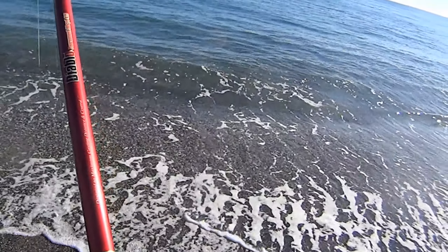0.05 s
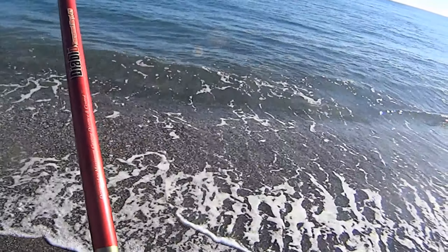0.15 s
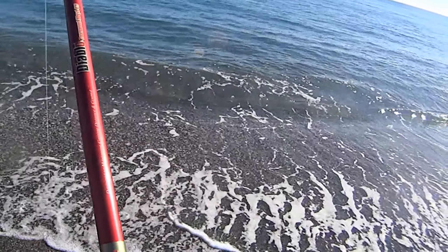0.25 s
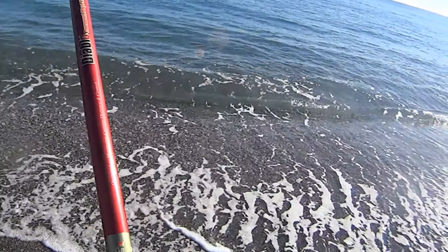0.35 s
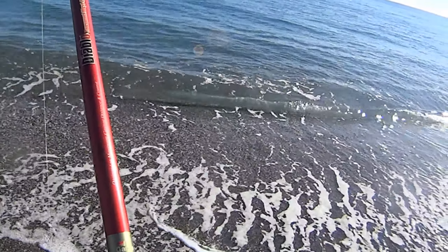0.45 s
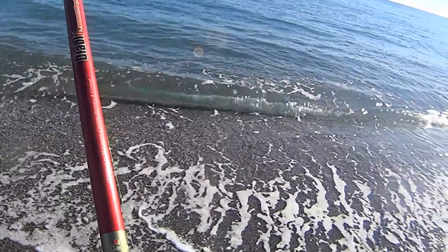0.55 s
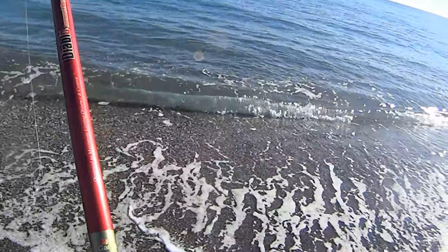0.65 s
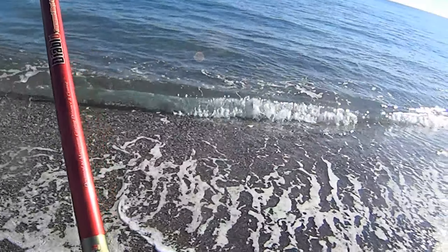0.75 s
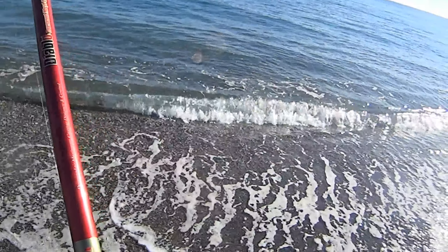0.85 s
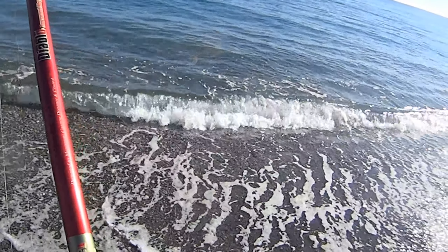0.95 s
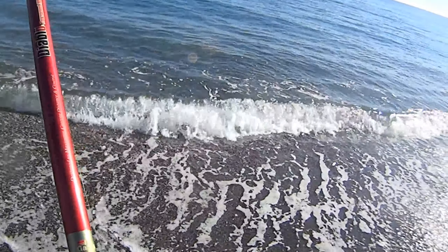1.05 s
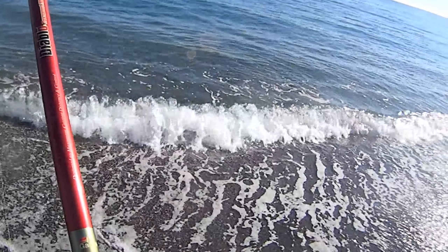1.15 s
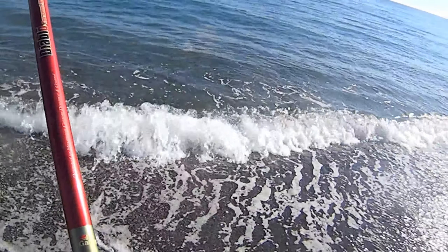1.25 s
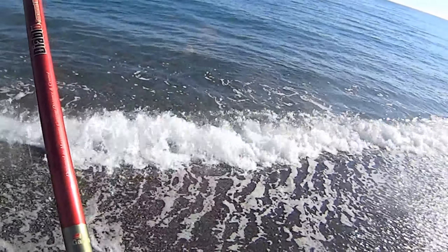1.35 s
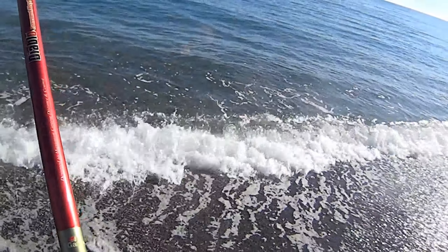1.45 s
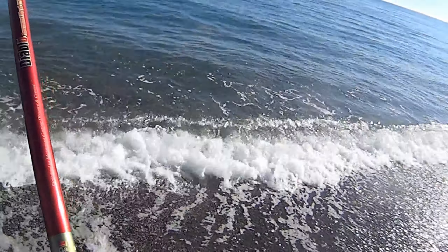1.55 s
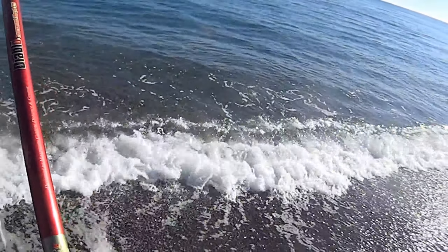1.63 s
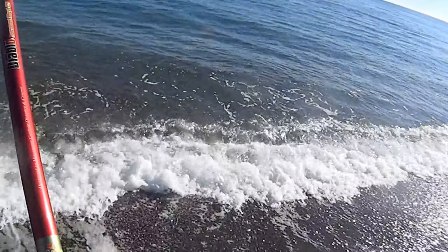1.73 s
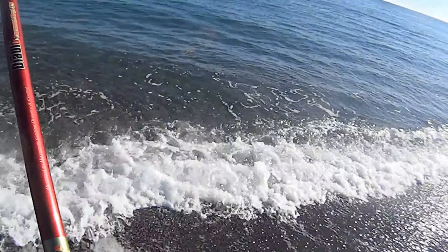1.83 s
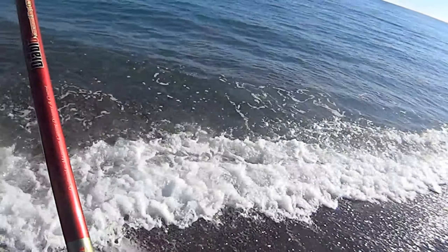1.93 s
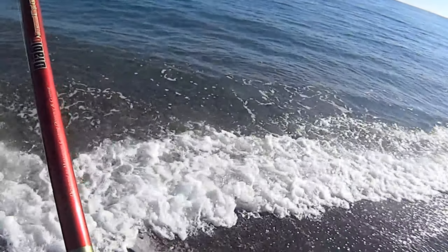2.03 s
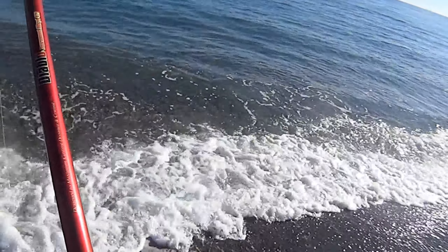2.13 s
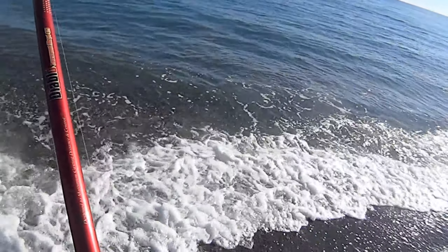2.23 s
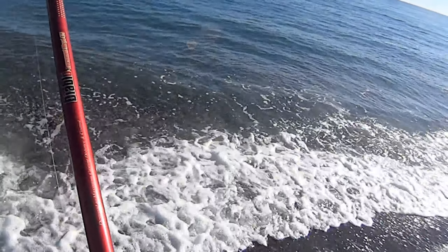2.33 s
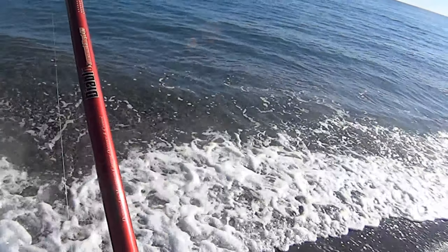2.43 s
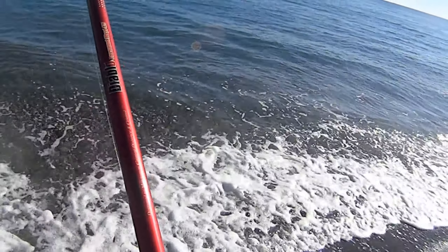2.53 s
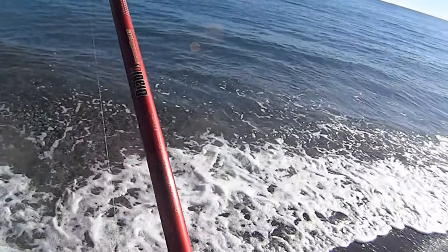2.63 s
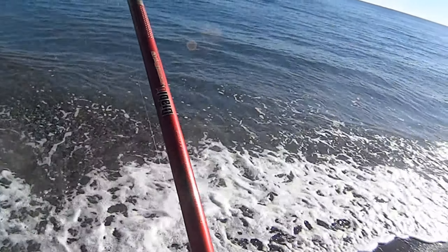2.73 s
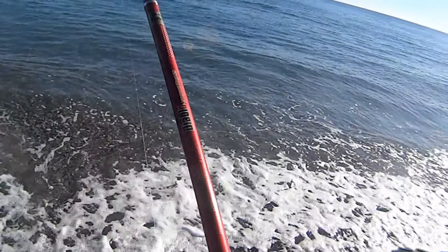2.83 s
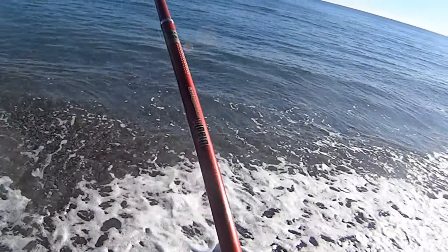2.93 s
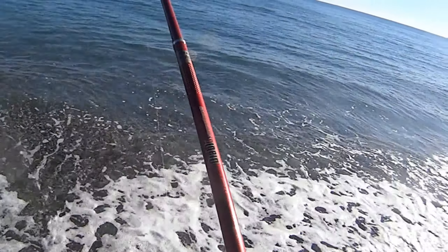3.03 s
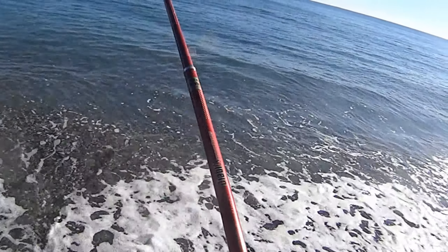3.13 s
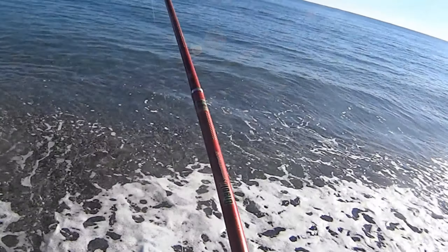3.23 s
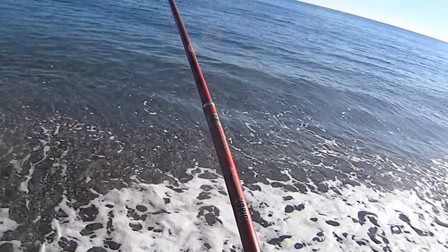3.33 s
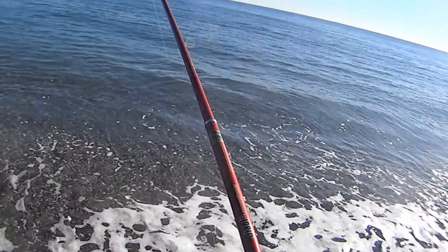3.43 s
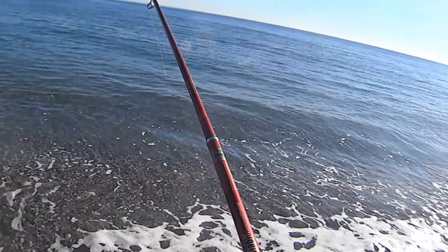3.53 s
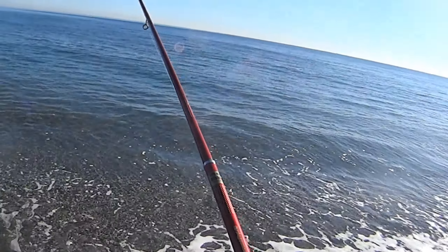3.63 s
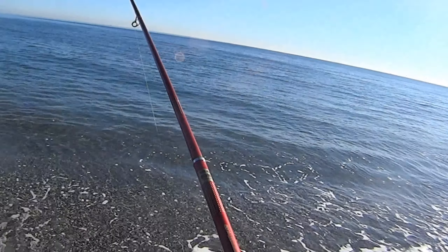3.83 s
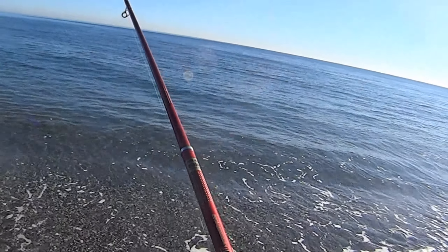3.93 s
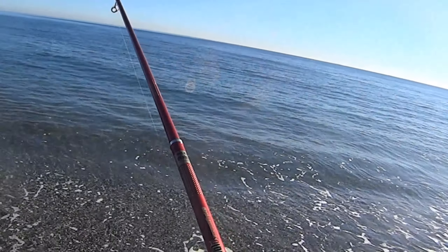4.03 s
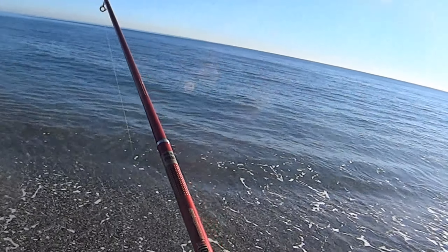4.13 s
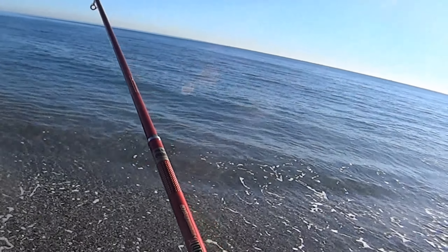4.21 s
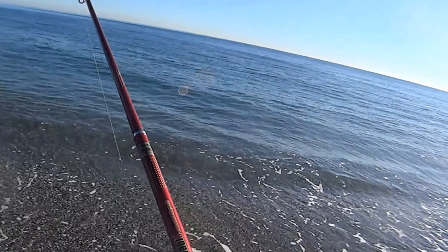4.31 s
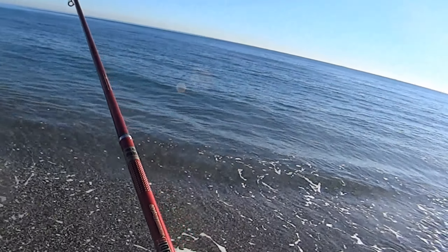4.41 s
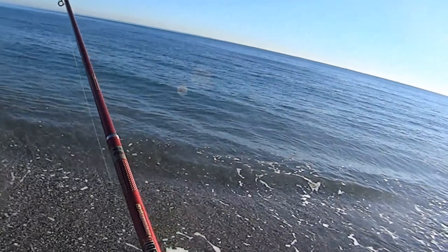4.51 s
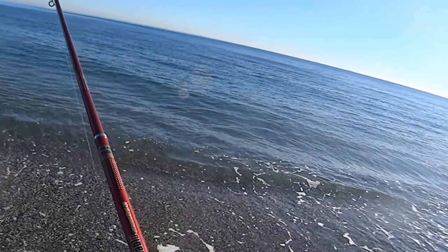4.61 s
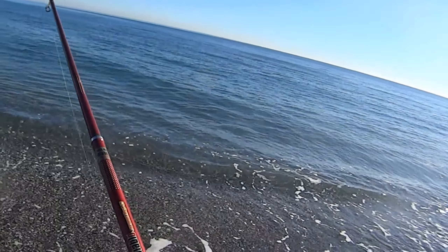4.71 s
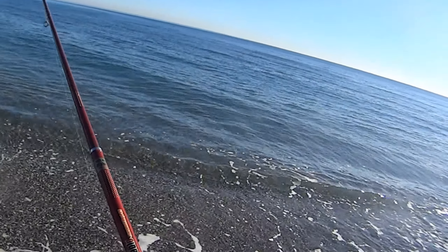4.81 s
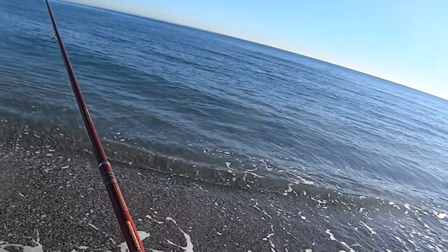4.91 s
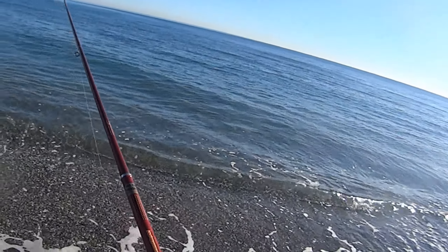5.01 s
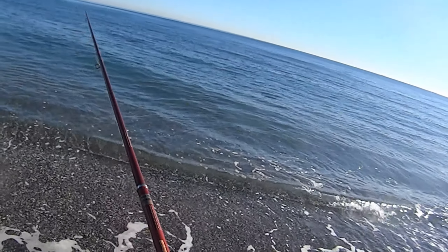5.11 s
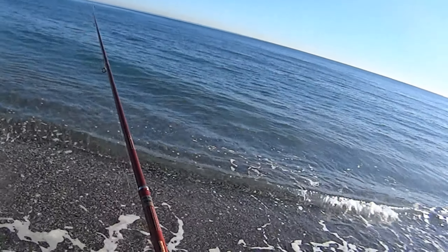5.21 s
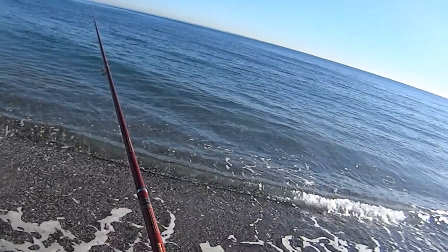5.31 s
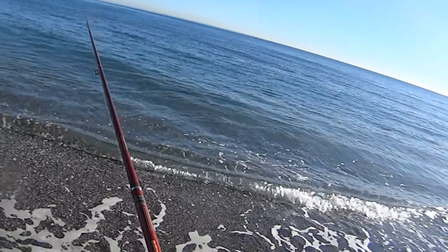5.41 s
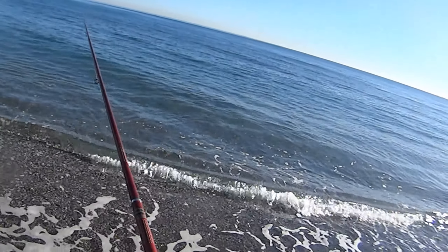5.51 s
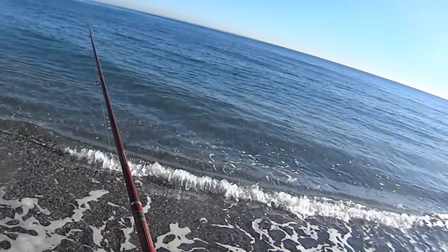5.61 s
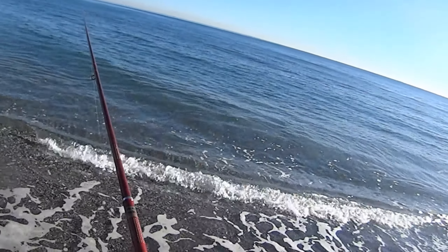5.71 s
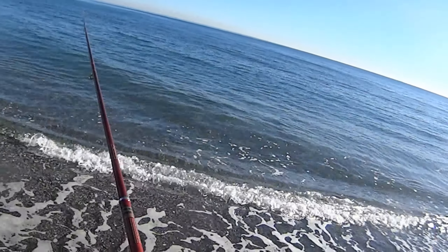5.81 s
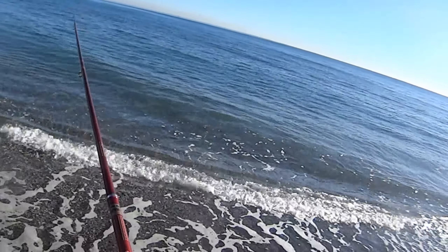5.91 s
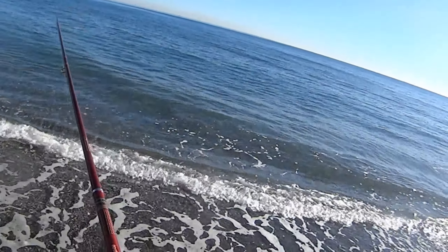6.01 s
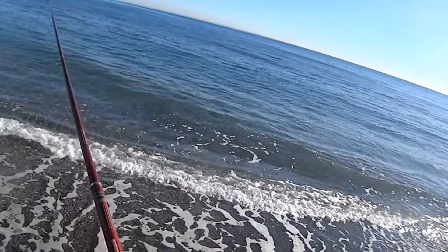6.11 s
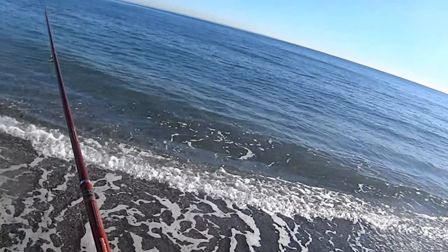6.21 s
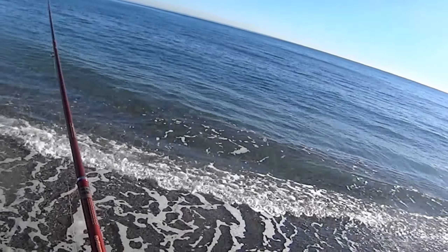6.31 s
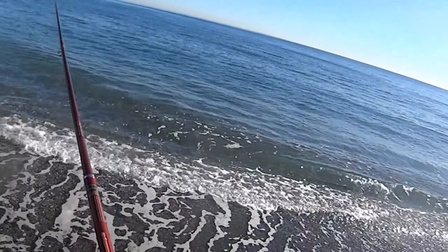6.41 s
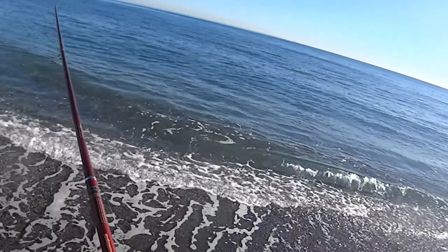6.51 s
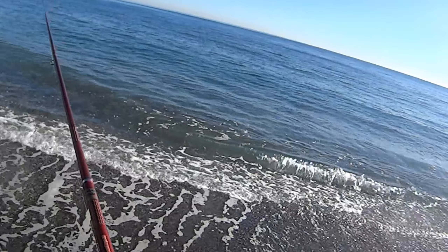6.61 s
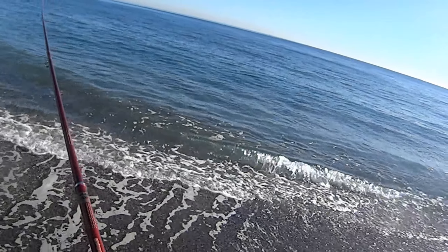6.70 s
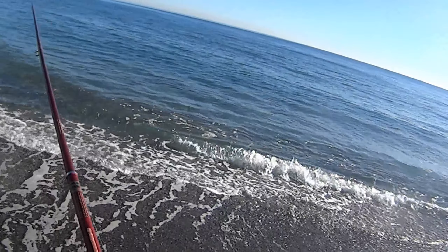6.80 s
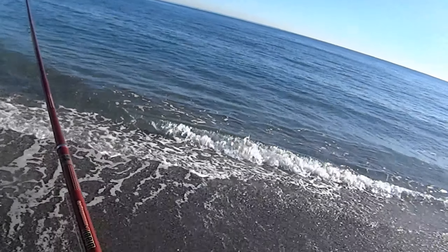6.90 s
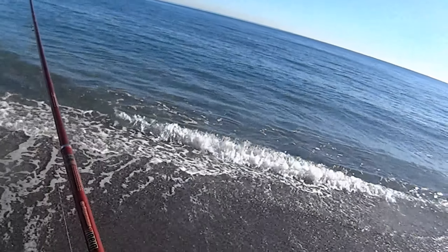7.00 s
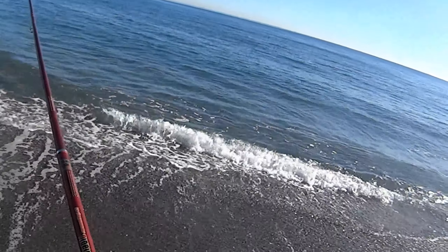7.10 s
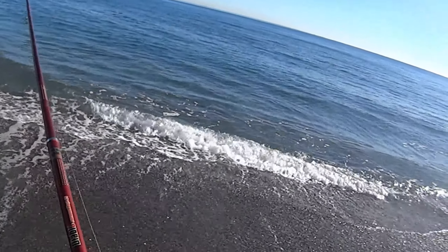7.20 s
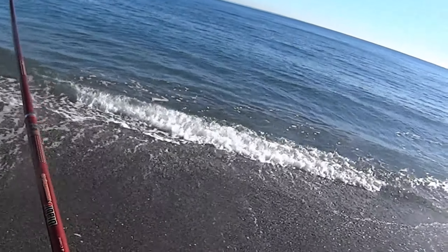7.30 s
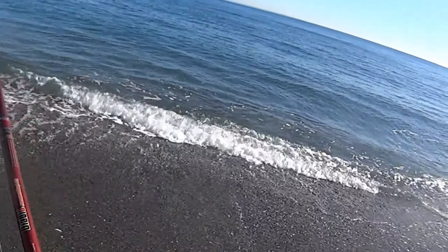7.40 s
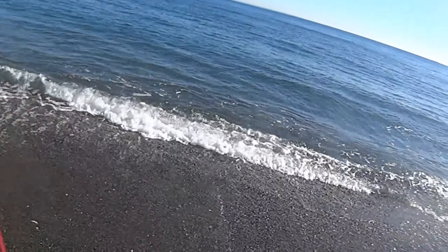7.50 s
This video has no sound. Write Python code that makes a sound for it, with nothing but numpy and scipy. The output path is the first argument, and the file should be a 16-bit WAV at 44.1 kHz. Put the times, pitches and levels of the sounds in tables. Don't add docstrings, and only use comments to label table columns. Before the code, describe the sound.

On an open pebble beach, a fishing reel ticks close to the microphones, about fifty bright, dry metallic clicks a second. Water fizzes quietly until a small wave rises from 0.7 s and breaks fullest at 1.2-1.6 s, a broad splashing rush with low gulping bubbles. The reel slows near 2 s, when a loud, hard double knock of tackle sounds; then winding speeds up. The wave drains into fine, crackling hiss by 3 s, leaving a calmer stretch to 4.5 s. Small hollow taps come around 4.6-4.8 s, light ticks near 5 s. A second wave swells, peaking at 5.6 s, while the reel whirrs fastest around 5.9 s. A clear knock lands at 6.1 s. Another breaker washes in near 6.9 s, with faint taps and a cluster of tiny clicks around 7.4-7.5 s. Soft wind rumble grows late beneath a dull distant surf roar; the housing gives a boxy, slightly resonant colour.

```python
import sys
import numpy as np
from scipy import signal
from scipy.fft import rfft, irfft, next_fast_len
from scipy.io import wavfile

SR = 44100
rng = np.random.default_rng(int(sys.argv[2]) if len(sys.argv) > 2 else 0)


def field_ratio(decibels):
    return 10 ** (np.asarray(decibels, dtype=float) / 20)


def wav_out(sig):
    wavfile.write(sys.argv[1], SR, np.round(np.clip(np.atleast_2d(sig).T, -1, 1) * 32767).astype(np.int16))


N = 332943
SIZE = next_fast_len(N + 8192)
HZ = np.maximum(np.arange(SIZE // 2 + 1) * SR / SIZE, 1)

# f/Hz, width/Hz, boost/dB
CAVITIES = [(1079, 110, 3.5), (1388, 85, 9.5), (1270, 80, 3.5), (1600, 110, 3), (2415, 100, 4),
            (3360, 300, 2), (670, 160, -3)]


def rms_one(x):
    return x / np.sqrt(np.mean(x ** 2) + 1e-20)


def pair_rms_one(both):
    return both / np.sqrt(np.mean(both.mean(axis=0) ** 2))


def in_time(rows):
    s, *columns = np.transpose(rows)
    return [np.interp(np.arange(N) / SR, s, c) for c in columns]


def in_pitch(rows):
    hz, *columns = np.transpose(rows)
    return [np.interp(np.log(HZ), np.log(hz), c) for c in columns]


def drift(rate):
    r = np.exp(-80 * np.pi * rate / SR)
    noise = rng.standard_normal(N // 40 + 2002)
    slow = signal.lfilter([1], [1, -2 * r, r * r], noise)[2000:]
    return np.interp(np.arange(N) / 40, np.arange(len(slow)), rms_one(slow))


def ring(clicks, hz, t60):
    r, w = field_ratio(-60 / (t60 * SR)), 2 * np.pi * hz / SR
    return signal.lfilter([0, np.sin(w)], [1, -2 * r * np.cos(w), r * r], clicks + 1e-18)


def housing():
    # f/Hz, level/dB per Hz
    colour = [(70, -29), (220, -18.5), (400, -13.5), (680, -13.5), (950, -10.5), (1400, -6), (1900, -14.5),
              (2700, -9.5), (3100, -3), (4500, -4.5), (5400, -2), (6600, -4.5), (8000, -10.5),
              (11000, -17.5)]
    peaks_db = sum(db / (1 + (2 * (HZ - hz) / width) ** 2) for hz, width, db in CAVITIES)
    return field_ratio(in_pitch(colour)[0] + peaks_db)


def ports(shared, own, gain):
    # f/Hz, likeness/0-1, left lead/rad, left-right/dB
    port_pair = [(40, 1, -0.011, 0.5), (130, 0.74, -0.71, 0.2), (300, 0.37, -0.49, 0),
                 (644, 0.17, -1.54, 1), (1050, 0.87, -1.8, 1.5), (1340, 0.74, -0.69, -1),
                 (1670, 0, -1.15, -1), (2440, 1, -1.7, -1), (3200, 0.55, -0.62, -5.5),
                 (4300, 0.97, -0.59, -2), (6100, 0.87, -0.22, -2), (7360, 0.66, 0.58, -2.5),
                 (9300, 1, 1, -1), (11200, 0.82, -1.4, -0.8)]
    alike, lead, pan_db = in_pitch(port_pair)
    alike = np.clip(alike, 0, 1)
    mid = np.sqrt(1 + alike) * rfft(shared, SIZE)
    side = np.sqrt(1 - alike) * rfft(own, SIZE)
    tilt = field_ratio(pan_db / 2) * np.exp(.5j * lead)
    both = np.array([(mid + side) * tilt, (mid - side) / tilt])
    return irfft(gain * both, SIZE)[:, :N] / np.sqrt(2)


def breeze():
    # t/s, peak level/dB
    gust_peaks = [(0.0, -75), (0.97, -67), (1.25, -61), (1.7, -66), (2.61, -59), (2.9, -64), (3.32, -62),
                  (3.97, -57), (4.15, -59), (4.7, -57), (5.28, -60), (5.85, -55.5), (6.14, -55),
                  (6.55, -50), (6.72, -51.5), (6.92, -52), (7.06, -54), (7.33, -50), (7.52, -50)]
    rise_db_per_s, fall_db_per_s, calm_db, far_surf_db = 70, 40, -78, -72.5
    gusts = rng.standard_normal((2, N)) * field_ratio(1.7 * drift(1.1))
    slope = HZ / 14 / (1 + (HZ / 20) ** 6.6)
    wind = rms_one(ports(*gusts, slope))
    shore_slope = HZ / 12 / (1 + HZ / 12) * (1 + 25 / HZ) / (1 + (HZ / 900) ** 10)
    shore = rms_one(ports(*rng.standard_normal((2, N)), shore_slope))
    late = np.arange(N) / SR - np.array(gust_peaks)[:, :1]
    swell_db = np.array(gust_peaks)[:, 1:] + np.minimum(rise_db_per_s * late, -fall_db_per_s * late)
    wind_db = np.maximum(swell_db.max(axis=0), calm_db) + 0.5
    return field_ratio(wind_db) * wind + field_ratio(far_surf_db + 10.5) * shore


def knocks():
    # t/s, peak level/dB, ring f/Hz, cavity level/dB, left-right/dB
    tackle = [(.2515, -39, 2100, -8, 0), (2.0197, -13.5, 2550, -30, 3), (2.0243, -8, 2650, -30, 2),
              (4.6043, -37, 1900, -8, -5), (4.7990, -31.5, 2300, 0, -6), (4.8030, -33, 1050, -6, -6),
              (4.8065, -35, 1200, -6, -6), (6.0883, -19.5, 2450, -22, -1.5), (6.7000, -35, 1400, -5, -2),
              (6.9100, -31, 1500, -8, -2.5), (7.1800, -34, 1700, -8, -2), (7.4320, -32, 1200, -8, -2)]
    # t/s, peak level/dB, ring f/Hz
    light_ticks = [(.0185, -30, 3300), (.4070, -24, 6000), (4.9900, -24, 5600), (5.0958, -26, 3830),
                   (5.1362, -23, 4600), (6.9924, -25, 5400), (7.3555, -25, 6000), (7.3672, -22, 6500),
                   (7.4665, -23, 6500), (7.4790, -18, 8000), (7.4868, -20, 5600), (7.4885, -24, 3300)]
    tick_cavity_db, tick_pan_db, thud_db = -25, -3, -12
    out, length = np.zeros((2, N)), 2048
    tap = np.diff(np.eye(1, length + 1, 1)[0])
    hollow = ring(tap, CAVITIES[0][0], .022) + .9 * ring(tap, CAVITIES[1][0], .03)
    thud = ring(np.cumsum(tap), 260, .006)
    blows = [*tackle, *((*tick, tick_cavity_db, tick_pan_db) for tick in light_ticks)]
    for s, peak_db, hz, cavity_db, pan_db in blows:
        body = ring(ring(tap, .8 * hz, .002), 1.12 * hz, .003)
        over = ring(ring(tap, 2.1 * hz, .002), 2.1 * hz, .003)
        body = body / abs(body).max() + field_ratio(-11) * over / abs(over).max()
        body += field_ratio(cavity_db + 14) * hollow + field_ratio(2 * cavity_db + thud_db + 14) * thud
        i = round(s * SR)
        pan = field_ratio([[pan_db / 2], [-pan_db / 2]])
        out[:, i:i + length] -= (field_ratio(peak_db - 0.5) * body * pan)[:, :N - i]
    return out


def reel():
    # t/s, speed/teeth per s, ticking level/dB, frame level/dB as the grip changes
    winding = [(0.0, 48, -53, -1), (0.15, 55, -50.5, -5), (0.4, 63, -48, -7), (0.7, 62, -46, -8),
               (0.85, 60, -50, -5), (2.0, 40, -50, -5), (2.2, 80, -45.5, -4), (2.44, 95, -48, -6),
               (2.66, 117, -46, -1), (3.3, 122, -45, -9), (3.9, 128, -50, -5), (4.3, 105, -51, -5),
               (4.8, 115, -50, -6), (5.1, 150, -47.5, -4), (5.5, 195, -44.5, -8), (5.87, 215, -43, -10),
               (6.3, 176, -45.5, -2), (7.55, 180, -46.5, -6)]
    # f/Hz, level/dB, t60/s
    frame_modes = [(2950, -1, .014), (3300, 0, .013), (3750, -2, .011), (4300, -4, .010)]
    pawl_modes = [(5050, -2, .014), (5400, -1, .015), (5750, 0, .015), (6150, 0, .015), (6600, -2, .013)]
    spring_modes = [(7500, 0, .007), (8300, -2, .006), (9500, -3, .006), (10200, -3, .005),
                    (10750, -1, .005)]
    spring_db, part_wander_db = -5.5, .7
    turn_s, push_at_s, push, full_swing_per_s = .376, 3.6, .08, 120
    speed, ticking_db, frame_db = in_time(winding)
    turn = np.cos(2 * np.pi * (np.arange(N) / SR - push_at_s) / turn_s)
    speed = speed * (1 + push * np.clip(speed / full_swing_per_s, 0, 1) ** 4 * turn)
    teeth_passed = np.cumsum(speed) / SR + .0019 * speed
    at = np.flatnonzero(np.diff(np.floor(teeth_passed)) > 0)
    age = np.arange(300) / SR
    rattle = (age / .00045) ** 2 * np.exp(-age / .00045)
    force, out = field_ratio(1.3 * rng.standard_normal(N)[at]), 0
    parts = (frame_modes, frame_db), (pawl_modes, 0), (spring_modes, spring_db + frame_db / 2)
    for part, part_db in parts:
        loud_db = ticking_db + part_db + part_wander_db * drift(2.5)
        rings = np.zeros((2, N))
        for hz, level_db, t60 in part:
            drops = np.zeros(N)
            drops[at] = force * field_ratio(level_db + 2.7 * drift(6.0)[at] + 1.3 * rng.standard_normal(N)[at])
            blows = signal.fftconvolve(drops, rattle)[:N] * rng.choice([-1, 1], (2, N))
            rings += ring(blows, hz, t60) / np.sqrt(t60)
        both = ports(*(rings / np.sqrt(speed)), 1) * field_ratio([[-1.1], [1.1]])
        out = out + field_ratio(loud_db + 1.8) * pair_rms_one(both)
    return out


def gulps():
    # t/s, level/dB, f/Hz
    pockets = [(1.24, -56, 300), (1.33, -52, 189), (1.42, -46, 330), (1.55, -60, 230), (1.76, -49, 300),
               (1.82, -49, 255), (2.142, -54, 250), (5.26, -51, 244), (5.72, -56, 289), (5.77, -48.5, 254),
               (6.701, -52, 377), (6.88, -58, 252)]
    out, age = np.zeros(N), np.arange(6000) / SR
    for s, level_db, hz in pockets:
        swell = age / 0.014 * np.exp(1 - age / 0.013)
        pulse = swell * np.sin(2 * np.pi * hz * age * (1 + 1.04 * age))
        out[round(s * SR):][:len(age)] += field_ratio(level_db) * pulse
    return ports(out, 0.2 * out, 0.97)


def water(low_hz, high_hz, bursts_per_s, cycles, share, patchy_db, churn_hz):
    pair, patches = [], [drift(churn_hz), drift(4 * churn_hz)]
    pitches = np.geomspace(low_hz, high_hz, num=8)
    for side in range(2):
        sizes = field_ratio(2.1 * np.minimum(rng.exponential(1, N), 5)) * rng.choice([-1, 1], N)
        born = rng.random(N) < bursts_per_s / SR
        dealt = rng.integers(0, 8, N)
        near = 0
        for k, hz in enumerate(pitches):
            near = near + ring(sizes * born * (dealt == k), hz, cycles / hz) * np.sqrt(hz)
        far = rng.standard_normal(N)
        pair.append(field_ratio(patchy_db * sum(patches)) * (share * rms_one(near) + far))
    band = 1 / np.sqrt((1 + (low_hz / HZ) ** 12) * (1 + (HZ / high_hz) ** 12))
    return pair_rms_one(ports(*pair, band * housing()))


def surf():
    # t/s, breaking level/dB, close fine froth level/dB
    waves = [(0.0, -58.5, -1.5), (0.5, -54.5, -3), (0.71, -49, 2.5), (0.9, -44.5, 2), (1.2, -40, 1),
             (1.5, -39.5, 1.5), (2.02, -42, -0.5), (2.27, -47, -1), (2.5, -53.5, 4), (2.96, -58, 6.5),
             (3.66, -57, 0.5), (4.31, -55, -4), (4.94, -50.5, -4.5), (5.62, -44, -1), (6.4, -50.5, -1.5),
             (6.92, -45, -1.5), (7.27, -48.5, -1.5), (7.55, -47, 1.5)]
    layer_edges = 100, 600, 1780, 7100, 12500
    plunge_lag_s = 0.074
    splash_db, froth_db = in_time(waves)
    late_db = in_time(np.add(waves, [plunge_lag_s, 0, 0]))[0]
    plunge_db = -66.5 + 1.23 * (late_db + 50)
    foam_db = splash_db + 11 + froth_db
    spray_db = -48 + 0.9 * (foam_db + 38)
    plunge = water(*layer_edges[0:2], bursts_per_s=260, cycles=12.4, share=.25, patchy_db=0.7, churn_hz=5.4)
    splash = water(*layer_edges[1:3], bursts_per_s=500, cycles=5.5, share=0.17, patchy_db=0.66, churn_hz=4.1)
    foam = water(*layer_edges[2:4], bursts_per_s=2500, cycles=5.2, share=0.34, patchy_db=0.55, churn_hz=17.0)
    spray = water(*layer_edges[3:5], bursts_per_s=1800, cycles=6.9, share=0.86, patchy_db=0.7, churn_hz=7.7)
    return field_ratio(plunge_db) * plunge + field_ratio(splash_db) * splash + field_ratio(foam_db) * foam + field_ratio(spray_db) * spray


def scene():
    return breeze() + knocks() + reel() + gulps() + surf()


def roll_off(x):
    return signal.sosfilt(signal.butter(12, 12080, fs=SR, output="sos"), x)


def record(dry):
    steep = signal.ellip(16, .3, 60, 10990, fs=SR, output="sos")
    return roll_off(signal.sosfilt(steep, dry))


dry = scene()
out = record(dry)
wav_out(out)
```